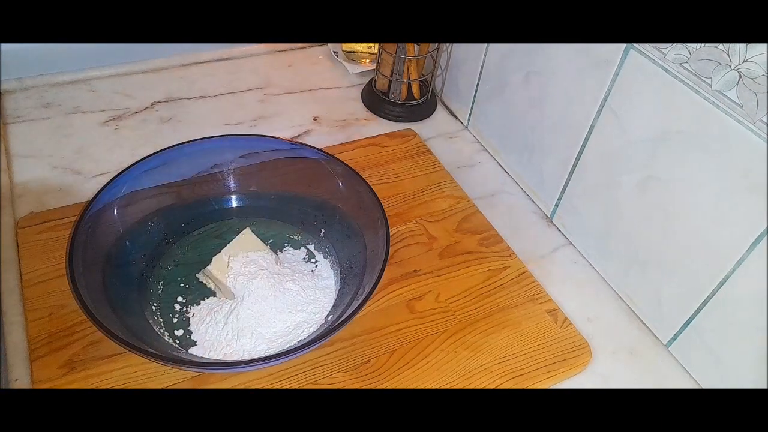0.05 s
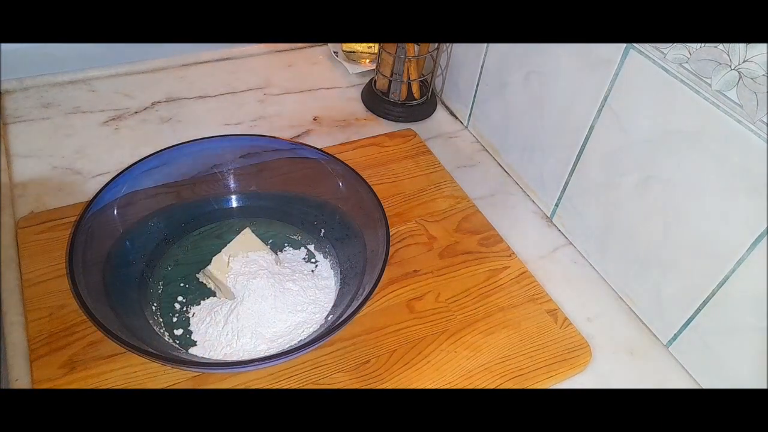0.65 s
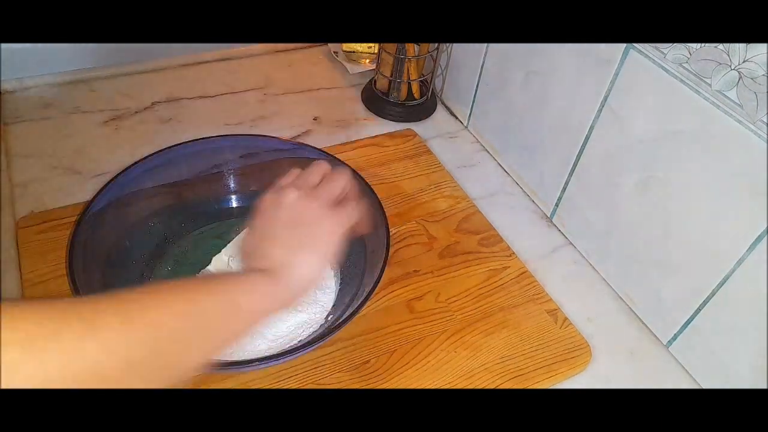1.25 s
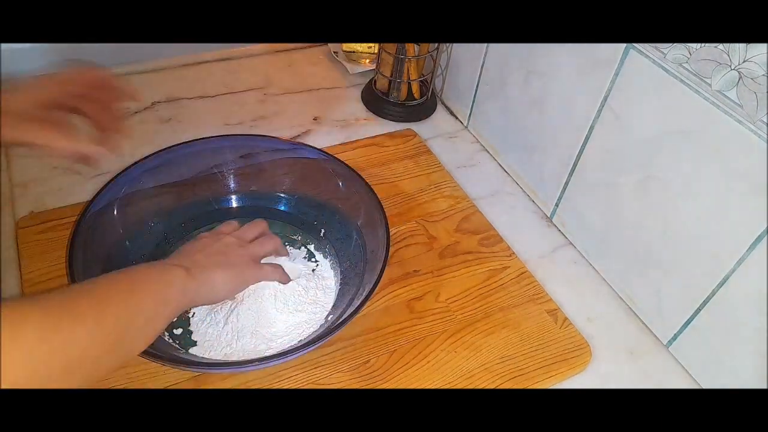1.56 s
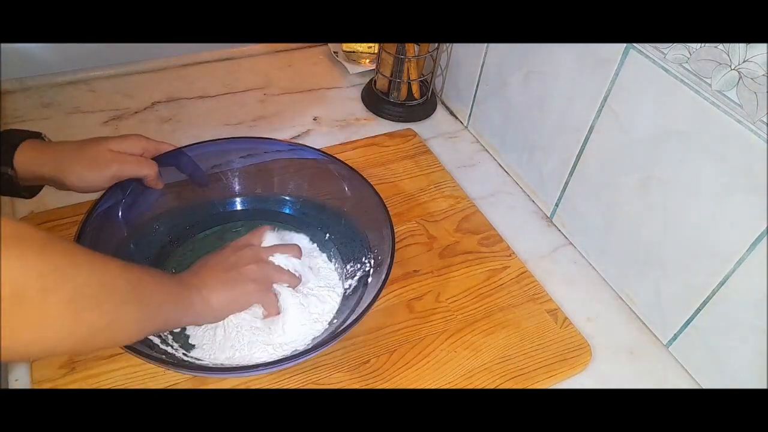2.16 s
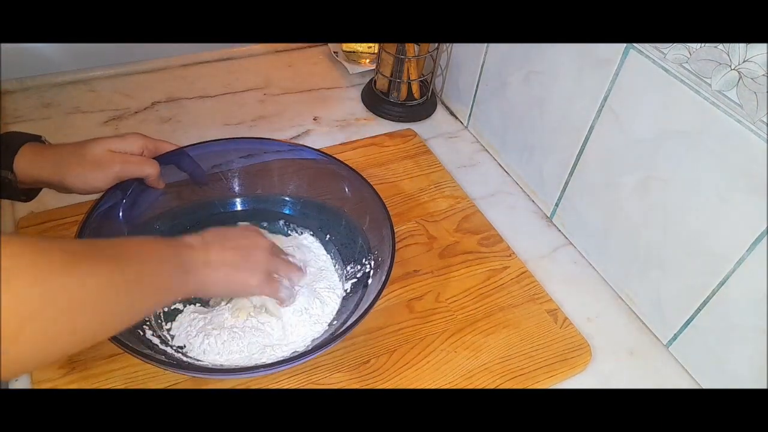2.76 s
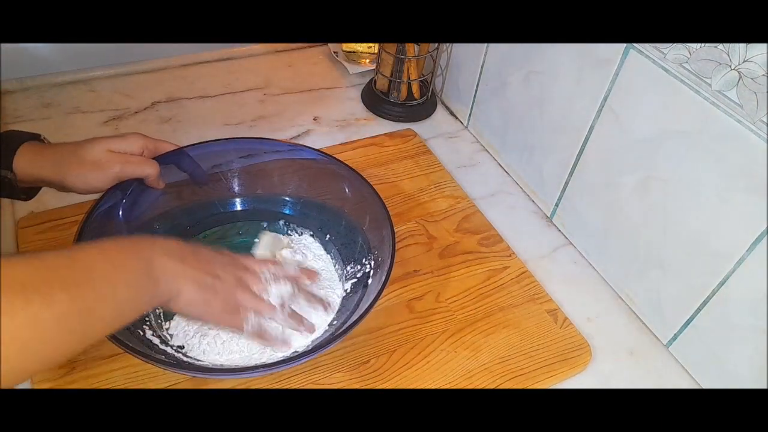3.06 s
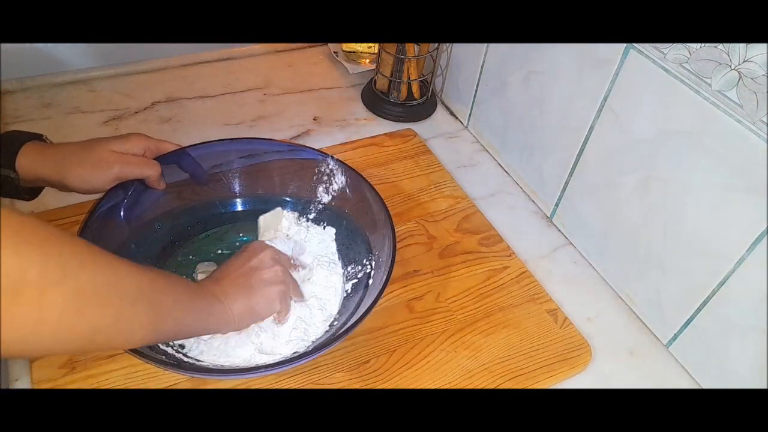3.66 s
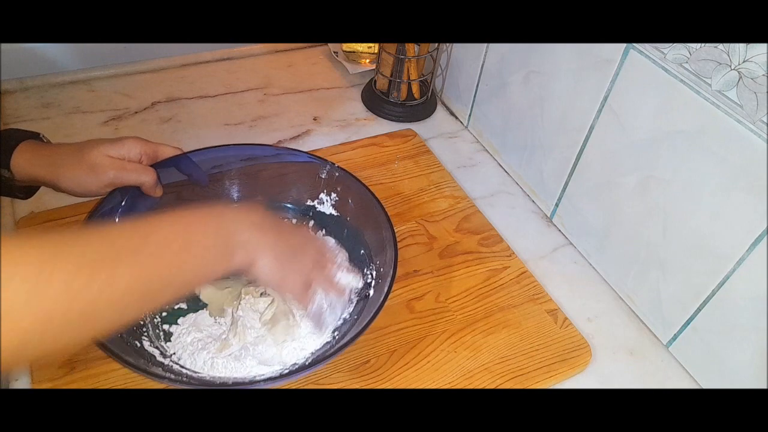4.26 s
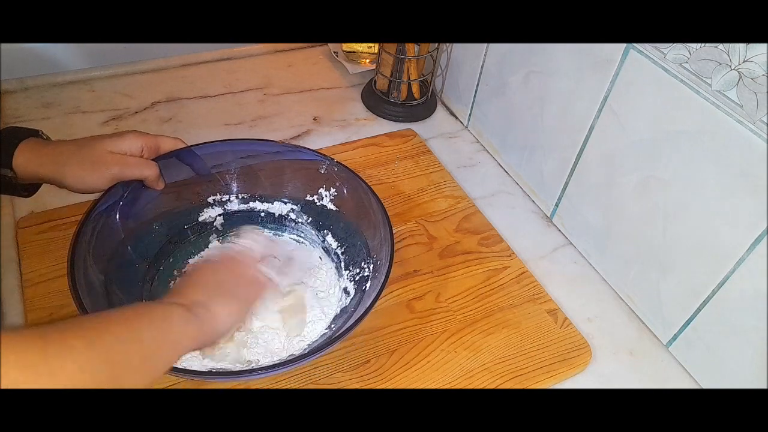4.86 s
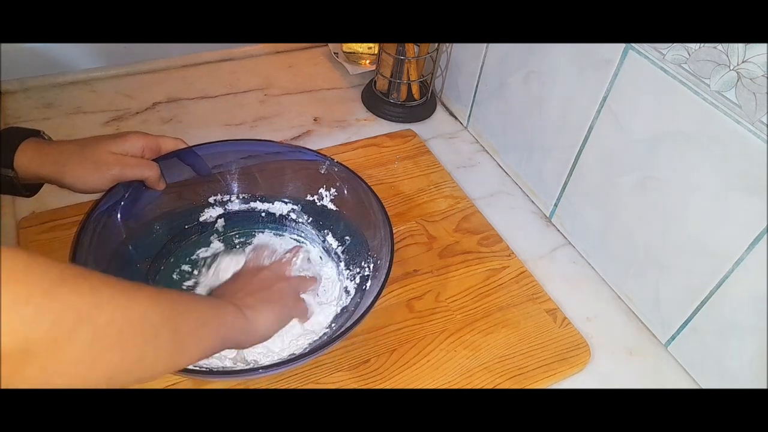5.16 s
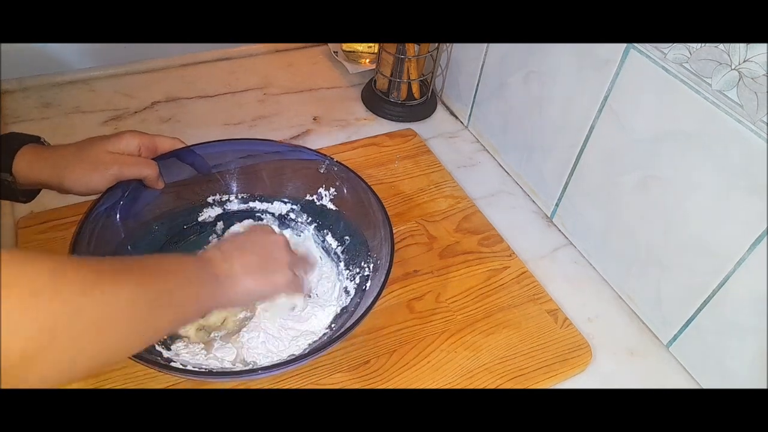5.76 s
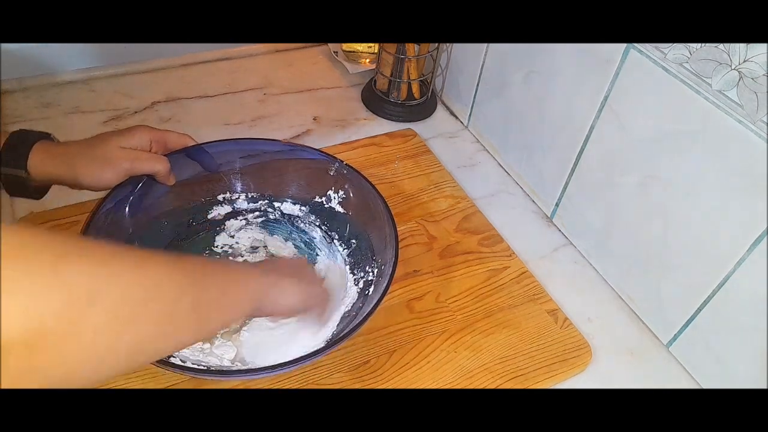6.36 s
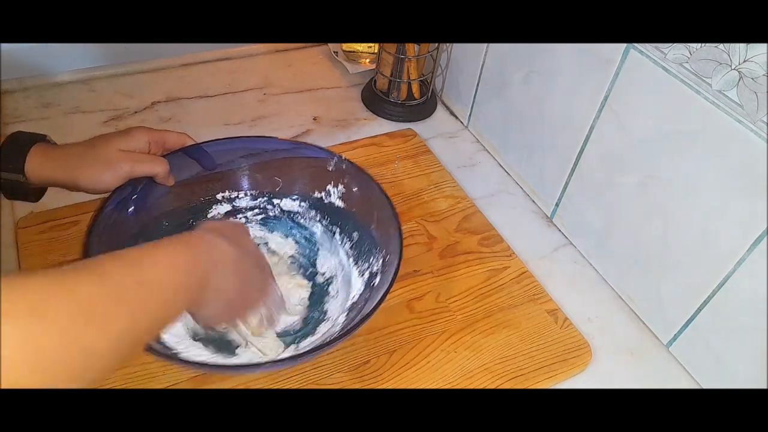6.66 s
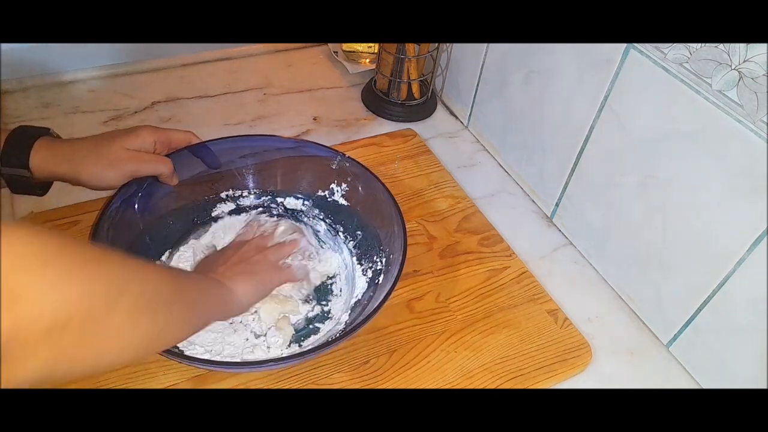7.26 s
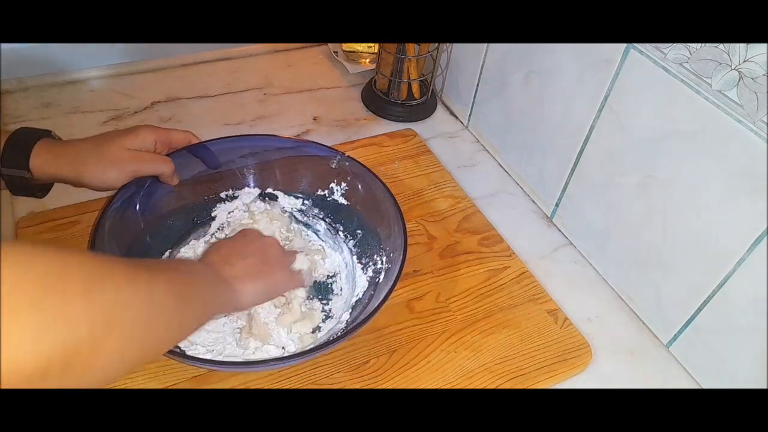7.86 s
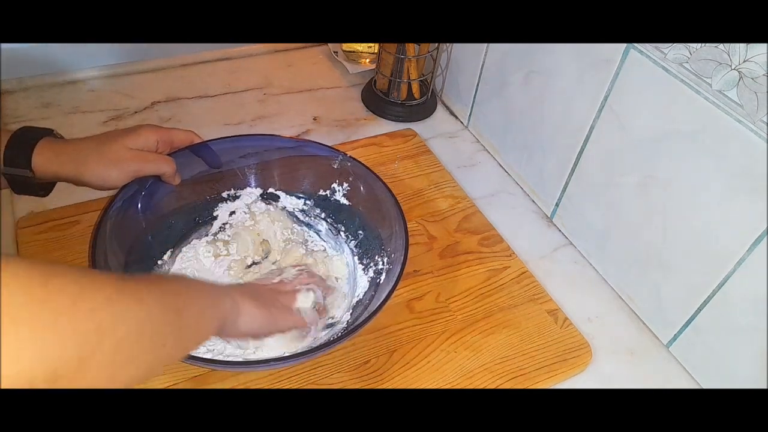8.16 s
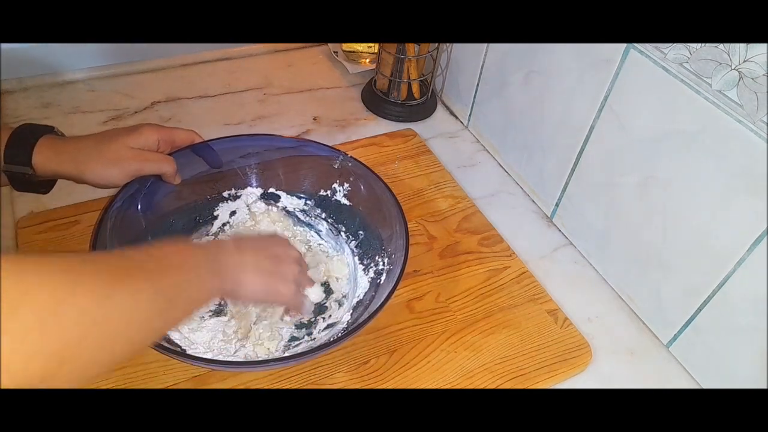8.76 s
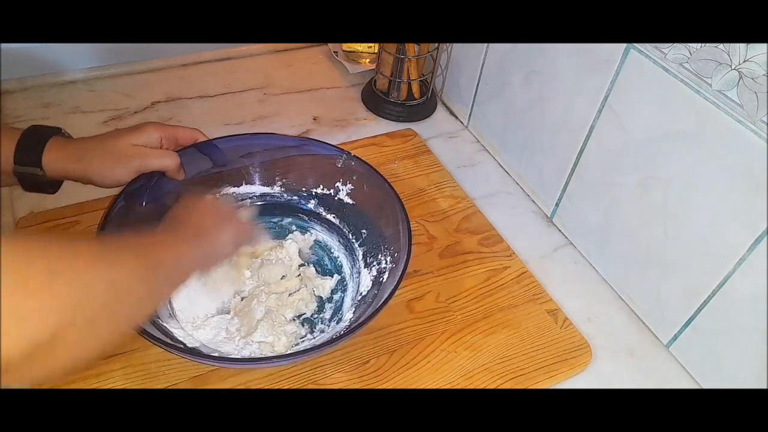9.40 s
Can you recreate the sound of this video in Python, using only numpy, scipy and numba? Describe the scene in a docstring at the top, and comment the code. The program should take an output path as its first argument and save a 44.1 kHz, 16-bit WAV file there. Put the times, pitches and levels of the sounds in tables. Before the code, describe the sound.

A faint low electrical hum runs throughout in a small tiled kitchen, with everything heard close up. At about 0.1 seconds a hard object lands on the counter, clattering and ringing briefly. A sleeve swishes softly twice around 0.7 to 1.2 seconds. From 1.3 seconds a hand works butter into flour in a big plastic bowl, with irregular dragging rubs, dry powdery hiss, sticky crackles and small snaps. The bowl knocks hollowly on a wooden board, most clearly near 1.8, 4.1, 6.1 and 8.9 seconds, more lightly near 2.5 and 7.7. Fingertips scuff and squeak faintly on the wall around 3, 6, 7 and 8 seconds. Brighter swishes of flour come at about 4.3 and from 6 to 6.5 seconds. The sticky crackling is busiest from 7 to 9 seconds, and another flour swish follows at about 9.2.

```python
"""Rubbing butter into flour

A small tiled kitchen with a low mains hum; two microphones close to a big plastic bowl on a wooden board.
Something hard is set down and rings, and a sleeve swishes past. Then a hand works in the bowl: dough
sticks and slips along the wall, flour hisses, skin squeaks, air pockets crackle in the squeezed butter,
and the bowl rocks and knocks on the board."""
import sys
import numpy as np
from scipy import signal
from scipy.fft import rfft, irfft, next_fast_len
from scipy.io import wavfile
from numba import njit

SR = 44100
rng = np.random.default_rng(int(sys.argv[2]) if len(sys.argv) > 2 else 0)


def generate_wav(sig):
    """Save sig (samples, or channels by samples) to the path in sys.argv[1] as 16-bit PCM at SR."""
    pcm = np.round(np.clip(np.atleast_2d(sig).T, -1, 1) * 32767).astype(np.int16)
    wavfile.write(sys.argv[1], SR, pcm)


N = 415863
T = np.arange(N) / SR
TAIL = T[:SR // 2]  # time within one short sound
HAND_IN_S = 1.2  # the hand reaches the flour

# first echoes off bowl, board and tiles: (left delay [s], right delay [s], level [dB])
ECHOES = [(.0013, 0.0018, -18.5), (.0036, 0.0031, -9), (.0056, .0060, -5), (.0095, 0.0087, -12)]
# how much the microphones differ on the bowl: (frequency [Hz], side gain [dB])
BOWL_WIDTH = [(100, -14), (250, 4.5), (500, -9.5), (700, -4), (1000, -1.5), (1600, 0)]
# room tone: (frequency [Hz], level [dB])
ROOM_TONE = [(25, -28), (60, -16), (115, 13.5), (190, 3), (300, -1.5), (450, -8), (700, -12.5),
             (1400, -19.5), (2000, -18), (3000, -23), (5200, -15.5), (7500, -16.5), (10000, -21),
             (14500, -29.5)]
# mains hum: (frequency [Hz], level [dB])
HUM_TONES = [(49.5, -67.5), (148.1, -59.5), (199, -69.5), (258.6, -79.5), (399.8, -71), (444.9, -78.5),
             (481.8, -78)]
# a hard object meets the counter: (time [s], level [dB], contact cutoff [Hz], crack [dB], ring [dB],
# hollow note [dB], ping [dB])
CLACKS = [(0.1382, -28.5, 13400, 16, -8, -3, -45), (0.149, -46, 9000, 33, -15, -20, -30),
          (0.158, -38, 6000, 17, -8, -16, -30), (0.267, -44, 2900, -8, -16, -7, -29),
          (0.276, -41, 3000, -3, -14, -12, -18), (0.2803, -48, 3500, 27, -4, -22, -20),
          (.311, -31, 11100, 1, -3, -2, -12), (0.336, -39, 13100, 9, -18, 2, -12)]
# its modes: (frequency [Hz], level [dB], t60 [s])
OBJECT_MODES = [(301, -4, .14), (537, -8, .14), (1035, -6, .13), (1300, -9, .08), (1491, -9, .14),
                (1685, -9, .1), (2019, -7, .14), (2140, -6, .15), (2664, -8, .12), (2935, -3, .13),
                (3252, -9, .09), (3491, -6, .12), (3898, -8, .08)]
# its rattle: (frequency [Hz], level [dB])
OBJECT_RATTLE = [(80, -10), (300, -8.5), (450, -3), (680, -4), (880, 3.5), (1200, -11.5), (2700, -8),
                 (4000, -12.5), (5500, -9.5), (6800, -26), (8500, -40), (11500, -42), (12900, -11.5),
                 (14500, -47)]
# passes of the sleeve: (start [s], rise [s], hold [s], level [dB])
SLEEVE_PASSES = [(0.676, 0.2, 0.041, -57.5), (0.907, 0.21, 0.022, -54)]
# sliding cloth: (frequency [Hz], level [dB])
CLOTH_SPECTRUM = [(200, -22), (900, -2), (1400, -6), (2800, -2.5), (5000, -2.5), (7500, -2), (10000, -7.5),
                  (14000, -4.5), (15500, -23)]
# rubs along the bowl: (start [s], rise [s], hold [s], dough [dB], flour [dB], hand resonance [Hz])
RUBS = [(1.324, 0.027, 0.17, -73, -66.5, 1860), (1.595, 0.029, 0.11, -61, -69, 1400),
        (1.878, 0.0064, 0.0047, -64, -35, 1600), (1.854, 0.05, 0.056, -40, -51.5, 1370),
        (2.525, 0.022, 0.084, -66, -67, 1200), (2.883, 0.03, 0.021, -46, -54, 1210),
        (2.938, 0.016, 0.093, -54.5, -54, 1320), (3.055, 0.02, 0.087, -43.5, -52.5, 1280),
        (3.157, 0.026, 0.0096, -37.5, -47, 1290), (3.331, 0.066, 0.048, -54, -57.5, 1190),
        (3.959, .015, 0.16, -60, -67, 1470), (4.137, 0.019, 0.13, -47.5, -48.5, 1450),
        (4.246, 0.062, 0.047, -43.5, -37, 2060), (4.38, 0.011, 0.011, -52, -62, 1200),
        (4.797, 0.036, 0.012, -53.5, -55, 1650), (4.862, 0.022, 0.073, -61, -59, 1880),
        (4.935, 0.012, 0.058, -46.5, -51, 1870), (4.99, .015, 0.064, -52.5, -57.5, 1100),
        (5.116, 0.021, 0.076, -56.5, -60, 1000), (5.933, 0.082, 0.048, -50.5, -50, 1730),
        (6.024, 0.05, 0.062, -47, -43, 2020), (6.096, 0.1, 0.21, -47, -45.5, 1760),
        (7.056, 0.05, 0.018, -46.5, -50.5, 1380), (7.14, 0.026, 0.11, -52.5, -55, 1030),
        (7.323, 0.013, 0.15, -59.5, -70, 1410), (7.564, 0.017, 0.2, -64, -60, 1520),
        (8.004, 0.041, 0.059, -45, -50, 1400), (8.12, 0.022, 0.078, -65, -58, 1600),
        (8.178, 0.02, 0.068, -49, -54.5, 1140), (8.726, 0.0093, 0.27, -53.5, -61, 1370),
        (8.862, 0.015, 0.01, -42.5, -42.5, 1570), (8.92, 0.083, 0.25, -55.5, -50.5, 1070),
        (9.09, 0.0089, 0.0097, -44.5, -65, 607), (9.113, 0.15, 0.047, -47, -43, 2400)]
# dragging dough: (frequency [Hz], level [dB])
DRAG_SPECTRUM = [(100, -26), (250, -46), (450, -10), (600, -1.5), (900, 1.5), (1150, -7), (1900, 2.5),
                 (3000, 1), (5000, -3.5), (8000, -53), (15000, -30)]
# air and wall resonances stirred by rubbing: (frequency [Hz], width [Hz], lift [dB])
CAVITY_PEAKS = [(608, 95, 18.5), (782, 74, 10.5), (1146, 250, 12.5), (1480, 67, 9), (1750, 98, 8),
                (2385, 100, 7)]
# dry flour: (frequency [Hz], level [dB])
FLOUR_SPECTRUM = [(200, -10), (700, -7.5), (1500, -5.5), (2600, 2), (4200, 5.5), (6000, 3), (7500, 3.5),
                  (10000, -3.5), (13000, -3), (15500, -17)]
# squeezes of the butter: (start [s], rise [s], hold [s], level [dB])
SQUEEZES = [(1.808, 0.054, 0.019, -44.5), (2.335, 0.2, 0.13, -61.5), (3.283, 0.08, 0.16, -59.5),
            (4.02, 0.08, 0.16, -56.5), (5.1, 0.086, 0.49, -67), (5.98, 0.095, 0.22, -49.5),
            (7.253, 0.019, 0.04, -55.5), (7.342, 0.079, 0.084, -54), (7.595, 0.025, 0.13, -58),
            (8.136, 0.068, 0.42, -57.5), (8.733, 0.056, 0.3, -53)]
# its crackle: (frequency [Hz], level [dB])
CRACKLE_SPECTRUM = [(300, -15), (1000, -0.5), (2500, 2), (6000, 3.5), (9000, 2.5), (13000, -2), (15500, -7)]
# butter letting go of the skin: (time [s], peak level [dB], centre [Hz], t60 [s])
SNAPS = [(1.701, -56, 3500, 0.16), (1.796, -36, 10300, 0.023), (1.886, -24.5, 5400, 0.019),
         (2.406, -46, 1800, 0.041), (3.178, -42, 2310, 0.02), (3.193, -42, 2200, 0.025),
         (3.971, -43.5, 5990, 0.026), (4.493, -58, 4640, 0.015), (4.946, -37, 3300, 0.035),
         (4.953, -40, 3800, .03), (4.998, -48, 2500, 0.036), (5.374, -43, 6030, 0.019),
         (7.069, -44.5, 2800, .05), (7.2464, -30, 6840, 0.02), (7.252, -34, 6500, 0.013),
         (7.359, -36, 12000, 0.0071), (7.375, -40, 3260, 0.097), (7.451, -41, 10200, .04),
         (7.617, -39, 11200, .012), (7.746, -41, 5400, 0.054), (8.02, -40, 2600, 0.09),
         (8.261, -37, 3600, 0.021), (8.381, -40, 3300, 0.044), (8.485, -51, 4000, 0.018)]
# skin catching on the wall: (midpoint [s], length [s], pitch [Hz], level [dB])
SQUEAKS = [(1.391, 0.12, 1740, -68), (1.687, 0.1, 1740, -65), (2.925, 0.063, 1520, -52),
           (3.0, 0.049, 1480, -56), (3.1, 0.057, 1520, -53), (6.003, 0.043, 1493, -53.5),
           (6.886, 0.28, 1910, -75.5), (7.11, 0.027, 1570, -51), (8.054, 0.087, 1903, -45),
           (8.785, 0.12, 1490, -58), (8.891, 0.039, 1687, -46)]
# fingertips juddering on the wall: (start [s], length [s], from [Hz], to [Hz], level [dB])
SCRAPES = [(1.692, 0.039, 3300, 4130, -57), (1.9, 0.046, 940, 1300, -49), (2.91, 0.031, 2400, 2200, -64),
           (3.075, 0.027, 1100, 1700, -48), (3.117, 0.014, 910, 1150, -39), (3.125, 0.045, 646, 630, -47.5),
           (3.134, 0.022, 1150, 1110, -43.5), (3.174, 0.025, 2110, 2570, -49.5),
           (3.178, 0.022, 1150, 950, -50), (3.28, 0.029, 1400, 1250, -61.5), (3.385, 0.036, 920, 850, -52),
           (4.812, 0.02, 2500, 2900, -59), (5.975, 0.054, 650, 720, -57), (6.04, 0.045, 1450, 1650, -54),
           (6.195, 0.12, 1100, 1250, -53), (6.24, .1, 725, 800, -55), (6.27, 0.089, 1660, 1500, -53),
           (6.33, 0.11, 1260, 1060, -54.5), (7.085, 0.059, 1260, 1460, -50.5),
           (7.135, 0.13, 1060, 870, -57), (8.06, 0.054, 1820, 1720, -49), (8.048, 0.065, 1280, 1200, -43.5),
           (8.058, 0.05, 780, 705, -50), (8.066, 0.024, 3060, 3370, -53), (8.2, 0.026, 1490, 1300, -47.5),
           (8.218, 0.028, 1010, 880, -50.5), (8.873, 0.045, 1580, 1720, -53)]
# shoved flour thinning or heaping up: (start [s], length [s], from [Hz], to [Hz], level [dB])
SWISHES = [(4.29, 0.058, 6200, 4400, -38.5), (4.315, 0.07, 3400, 2230, -47.5),
           (4.944, 0.044, 4000, 3220, -51), (6.05, .08, 5900, 3800, -48.5), (6.24, 0.053, 4300, 4800, -51),
           (6.39, 0.086, 4200, 5200, -52), (9.2, 0.17, 2660, 4360, -49.5)]
# the bowl meets the board: (time [s], wall [dB], contact cutoff [Hz], tock pitch [Hz],
# tock over wall [dB], base thud [dB], slap [dB])
KNOCKS = [(1.624, -47.5, 1080, 182, 3.5, -47.5, -70), (1.795, -34.5, 4370, 443, -4.5, -46, -41),
          (1.806, -33.5, 1500, 172, 14, -60, -46.5), (1.832, -42, 900, 403, 5, -50, -60),
          (2.522, -45, 2400, 690, 1, -50, -51), (2.53, -51.5, 1200, 280, -4, -51, -64),
          (2.872, -57, 4000, 600, -3, -55, -64), (2.906, -52, 800, 257, 19, -55, -70),
          (3.971, -59.5, 1200, 700, -21, -53, -66), (4.0491, -34.5, 1790, 615, 0, -46, -47.5),
          (4.056, -38, 1100, 287, 14, -46, -48), (4.089, -55, 900, 706, -2, -51, -52),
          (4.83, -70, 3500, 710, 2, -82, -55), (6.143, -38, 1600, 645, 1, -45.5, -43.5),
          (7.667, -56.5, 1200, 744, 2, -73, -66), (7.709, -44, 4500, 330, 0, -46, -44.5),
          (7.720, -47.5, 800, 296, 21, -49, -72), (8.860, -37, 1050, 672, 5, -50, -49),
          (9.007, -43.5, 1900, 686, -7, -44.5, -46.5), (9.031, -57, 700, 250, -3, -49, -64)]
# the bowl's wall: (frequency [Hz], level [dB], t60 [s])
WALL_MODES = [(200, -3.5, 0.054), (300, 2, 0.034), (417, -3, 0.11), (610, 3, 0.074), (744, 0, 0.15),
              (830, 6.5, 0.053), (1040, -19, 0.044), (1373, -22, 0.043), (1560, -6, 0.07),
              (1720, -5, 0.037), (1990, -16, 0.075)]
# its dense wash of modes: (frequency [Hz], level [dB])
WALL_WASH = [(80, -17), (200, 17), (310, 1), (500, 6), (750, -4), (1200, -3.5), (3000, -4.5), (6000, -5),
             (9000, -8), (15000, -52)]
# its base on the board: (frequency [Hz], level [dB], t60 [s])
BASE_MODES = [(71.8, -9.5, 0.46), (97, -3.5, 0.11), (120.6, -4.5, 0.42), (142.6, -5, 0.33), (170, 8, 0.038)]
# slap of its flat bottom: (frequency [Hz], level [dB])
SLAP_SPECTRUM = [(250, -27), (480, -5), (700, 12), (1000, 3.5), (1400, 0), (2000, -7), (2700, -16.5),
                 (5500, -16.5), (9000, -30), (15000, -45)]


def undb(db):
    """Decibels to gain."""
    return 10 ** (np.asarray(db) / 20)


def unit(x):
    """Scale to rms 1."""
    return x / np.sqrt(np.mean(x ** 2))


def onset_unit(x):
    """Scale a blow so that its first 25 ms have rms 1."""
    return x / np.sqrt(np.mean(x[:, :SR // 40] ** 2))


def add(out, s, sound):
    """Mix a sound in at s seconds."""
    i = int(s * SR)
    out[:, i:i + sound.shape[1]] += sound[:, :N - i]


def walk(rate):
    """Random drift of spread near 1, turning rate times a second."""
    knots = rng.standard_normal(N // 20)
    return np.interp(T * rate, np.arange(len(knots)), knots)


def fade(t60):
    """Exponential decay after a blow."""
    return np.exp(-np.log(1000) * TAIL / t60)


def push(start, rise, hold, release_t60=0.14, sag_db_per_s=2.5, settle_db=-13, settle_t60=0.68):
    """Gain of one movement: it builds up, eases while held, lets go and settles."""
    age = T - start
    eased_db = sag_db_per_s * np.clip(age - rise, 0, hold)
    after = np.log(1000) * np.maximum(age - rise - hold, 0)
    release = np.maximum(np.exp(-after / release_t60), undb(settle_db) * np.exp(-after / settle_t60))
    return np.clip(age / rise, 0, 1) * undb(-eased_db) * release


def colour(x, points, peaks=()):
    """Filter by points (frequency [Hz], gain [dB]) and peaks (centre [Hz], width [Hz], lift [dB])."""
    size = next_fast_len(x.shape[-1] + 4096, True)
    f = np.fft.rfftfreq(size, 1 / SR)
    hz, db = np.transpose(points)
    gain_db = np.interp(np.log(f + 1), np.log(hz), db)
    for centre, width, lift in peaks:
        gain_db = gain_db + lift / (1 + (2 * (f - centre) / width) ** 2)
    return irfft(rfft(x, size) * undb(gain_db), size)[..., :x.shape[-1]]


def soften(x, hz):
    """A longer contact takes away the treble."""
    return signal.sosfilt(signal.butter(2, min(hz, SR / 3), fs=SR, output="sos"), x)


@njit
def resonate(x, hz, q):
    """Band-pass with a moving centre, gain 1 there."""
    y = np.empty(len(x))
    band, low = 0., 0.
    for i in range(len(x)):
        g = np.tan(np.pi * hz[i] / SR)
        v = (band + g * (x[i] - low)) / (1 + g * (g + 1 / q))
        band, low = 2 * v - band, low + 2 * g * v
        y[i] = v / q
    return y


def diffuse(size, split_hz=750, bass_side=0.21):
    """Noise at two close microphones: alike in the bass, unrelated in the treble."""
    mid, side = rng.standard_normal((2, size))
    treble = signal.sosfilt(signal.butter(1, split_hz, "high", fs=SR, output="sos"), side)
    side = bass_side * side + (1 - bass_side) * treble
    return np.array([mid + side, mid - side])


def grains(rate, spread_db):
    """Random clicks of unequal size, each shared differently between the microphones."""
    hits = rng.random(N) < rate / SR
    size = np.minimum(rng.exponential(size=N), 3.3)
    angle = 2 * np.pi * rng.random(N)
    return hits * undb(spread_db * size) * np.array([np.cos(angle), np.sin(angle)])


def ring(modes, apart_hz=1100):
    """Struck modes; the higher ones reach the two microphones out of step."""
    out = 0
    for hz, db, t60 in modes:
        skew = min(hz / apart_hz, 1) * rng.choice([-1, 1]) * np.pi / 4 * np.array([[1], [-1]])
        out = out + rng.choice([-1, 1]) * undb(db) * fade(t60) * np.sin(2 * np.pi * hz * TAIL + skew)
    return out


def room(x, wet_db, early_db, t60=0.3):
    """Direct sound, echoes off the nearest surfaces, then the quick, dense ring of the kitchen."""
    tail = diffuse(len(TAIL)) * fade(t60) * (TAIL > .003)
    echo = undb(wet_db) * tail / np.sqrt(np.sum(tail ** 2) / 2)
    for left_s, right_s, db in ECHOES:
        echo[[0, 1], [int(left_s * SR), int(right_s * SR)]] += undb(db + early_db)
    echo = colour(echo, [(100, 7.5), (400, 10.5), (5000, -6.0), (15000, -0.5)])
    return x + signal.oaconvolve(x, echo, axes=1)[:, :N]


def narrow(x):
    """Most of the bowl's low notes reach both microphones almost in step."""
    mid = (x[0] + x[1]) / 2
    side = colour((x[0] - x[1]) / 2, BOWL_WIDTH)
    return np.array([mid + side, mid - side])


def room_tone(floor_db=-59.0, hum_db=-1, waver_db=1.2):
    """The kitchen itself: a faintly wavering mains hum over rumble and hiss."""
    hum = sum(undb(db + waver_db * walk(11)) * np.sin(2 * np.pi * (hz * T + rng.random()))
              for hz, db in HUM_TONES)
    return undb(floor_db) * unit(colour(diffuse(N), ROOM_TONE)) + undb(hum_db) * np.sqrt(2) * hum


def set_down(crack_hz=2500, rattle_db=-3, hollow_hz=863, swell_s=0.027, beat_hz=27, ping_hz=5201):
    """A hard object lands, tips and settles on the counter; its cavity rings up slowly under a ping."""
    out, notes = np.zeros((2, 2, N))
    crack = np.sin(2 * np.pi * crack_hz * TAIL) * fade(t60=0.0019)
    swell = onset_unit(np.array([fade(t60=0.21) * (1 - np.exp(-TAIL / swell_s))]))
    skew = np.array([[1.12], [-1.12]])  # phase at each microphone [rad]
    for s, db, cutoff_hz, crack_db, ring_db, hollow_db, ping_db in CLACKS:
        rattle = onset_unit(colour(diffuse(len(TAIL)) * fade(t60=0.14), OBJECT_RATTLE))
        modes = onset_unit(ring(OBJECT_MODES))
        blow = undb(crack_db) * crack + undb(ring_db) * modes + undb(rattle_db) * rattle
        add(out, s, undb(db) * onset_unit(soften(blow, cutoff_hz)))
        # a close second mode beats against the hollow note
        twin = undb(-10) * np.sin(2 * np.pi * ((hollow_hz - beat_hz) * TAIL + rng.random((2, 1))))
        hollow = undb(hollow_db) * swell * (np.sin(2 * np.pi * hollow_hz * (TAIL + s) + skew) + twin)
        ping = undb(ping_db) * fade(t60=0.25) * np.sin(2 * np.pi * ping_hz * (TAIL + s) + skew / 2)
        add(notes, s, undb(db) * (hollow + ping))
    return room(out, wet_db=-7.5, early_db=-11.5) + notes


def sleeve(flutter_db=1):
    """Cloth slides close by the microphones, twice, as the arm reaches for the bowl."""
    power = sum((undb(db) * push(start, rise, hold, release_t60=0.33)) ** 2
                for start, rise, hold, db in SLEEVE_PASSES)
    return unit(colour(diffuse(N), CLOTH_SPECTRUM)) * np.sqrt(power) * undb(flutter_db * walk(35.2))


def hand(rest_drag_db=-107.5, rest_flour_db=-69.5, closed_hz=890, closing_s=0.83, waver_octaves=0.37):
    """Dough gain, flour gain and the hand's resonance, which shifts as the fingers close and move."""
    drag_power = np.full(N, undb(rest_drag_db) ** 2)
    flour_power = (T > HAND_IN_S) * undb(rest_flour_db) ** 2  # a faint flour hiss stays on between rubs
    weighted_hz = drag_power * closed_hz  # the strongest rub sets the resonance
    for start, rise, hold, drag_db, flour_db, open_hz in RUBS:
        power = push(start, rise, hold) ** 2
        hz = closed_hz + (open_hz - closed_hz) * np.exp(-np.maximum(T - start, 0) / closing_s)
        drag_power += power * undb(drag_db) ** 2
        flour_power += power * undb(flour_db) ** 2
        weighted_hz += power * undb(drag_db) ** 2 * hz
    pressure = undb(-0.24 * walk(25))
    hollow_hz = weighted_hz / drag_power * 2 ** (waver_octaves * walk(30))
    return np.sqrt(drag_power) * pressure, np.sqrt(flour_power * pressure), hollow_hz


def rubbing(drag_gain, flour_gain, hollow_hz, hollow_q=2.6, drag_db=-4.5, flour_db=-3.5, rumble_db=-38):
    """Dough sticks and slips under the cupped hand, flour grains shear, and the push shakes the base."""
    slip_db = 2.5 * walk(110)
    friction = colour(grains(rate=1500, spread_db=2.0), DRAG_SPECTRUM, CAVITY_PEAKS)
    cupped = np.array([resonate(side, hollow_hz, hollow_q) for side in friction])
    drag = unit(cupped + undb(-7) * friction) * drag_gain * undb(drag_db + slip_db)
    hiss = unit(colour(grains(rate=7000, spread_db=0.5), FLOUR_SPECTRUM))
    flour = hiss * flour_gain * undb(flour_db + slip_db / 2)
    shake = colour(diffuse(N),
                   [(30, 0), (70, -23), (125, 6), (175, -13), (260, -9), (600, -13.5), (3000, -100)])
    rumble = unit(shake) * undb(rumble_db) * drag_gain ** 0.35
    return narrow(room(drag + flour, wet_db=-4.5, early_db=-1.5)) + rumble


def butter(crackle_db=-5.5, stray_db=-50):
    """Air pockets burst in squeezed butter, a few between squeezes; it snaps as it lets go of the skin."""
    squeeze = sum(undb(db) * push(start, rise, hold) for start, rise, hold, db in SQUEEZES)
    out = unit(colour(grains(rate=500, spread_db=0), CRACKLE_SPECTRUM)) * undb(crackle_db) * squeeze
    out += colour(grains(rate=6, spread_db=1), CRACKLE_SPECTRUM) * undb(stray_db) * (T > HAND_IN_S)
    for s, db, hz, t60 in SNAPS:
        band = [(hz / 8, -30), (hz / 2, -11), (hz, 0), (2 * hz, -9), (4 * hz, -16)]
        snap = colour(diffuse(len(TAIL)) * fade(t60), band)
        add(out, s, undb(db) * snap / np.abs(snap).max())
    return room(out, wet_db=-2, early_db=-4)


def crumbs(drag_gain, per_s=170, low_hz=650, high_hz=5000, crumb_db=-0.5, spread_db=2.4, cycles=1.8):
    """Lumps break under the hand: tiny ticks of random pitch and size that follow the drag."""
    out, age = np.zeros((2, N)), TAIL[:SR // 100]
    for when, pitch, luck, turn in rng.random((int(per_s * N / SR), 4)):
        hz = low_hz * (high_hz / low_hz) ** pitch
        size = drag_gain[int(when * N)] * undb(crumb_db + spread_db * min(-np.log(1 - luck), 3))
        skew = np.pi * (turn - .5) * np.array([[1], [-1]])
        add(out, when * N / SR, size * np.exp(-age * hz / cycles) * np.sin(2 * np.pi * hz * age + skew))
    return out


def squeaks(width_hz=220):
    """Skin catches on the wall: stick-slip locks briefly onto one rough pitch."""
    out = np.zeros((2, N))
    for s, length, hz, db in SQUEAKS:
        band = [(hz / 2, -50), (hz, -30), (2 * hz, -50)]
        tone = unit(colour(diffuse(len(TAIL)), band, peaks=[(hz, width_hz, 30)]))
        add(out, s - length / 2, undb(db) * tone * np.sin(np.pi * np.minimum(TAIL / length, 1)))
    return out


def knocks(crack_db=9, tock_t60=0.029, flex_hz=300, detune=0.025, contact_s=0.00073, swell_s=0.0042):
    """The bowl rocks onto the board: a slap, a damped tock, a ringing wall and a thud from the base."""
    out = np.zeros((2, N))
    for s, wall_db, cutoff_hz, tock_hz, tock_db, base_db, slap_db in KNOCKS:
        wash_decay = fade(t60=0.35) + undb(crack_db) * fade(t60=0.04)
        wash = colour(diffuse(len(TAIL)) * wash_decay, WALL_WASH)
        tock = ring([(tock_hz, 0, tock_t60), (flex_hz, -8, tock_t60)], apart_hz=2170)
        # the grip shifts the wall's pitch from knock to knock
        wall = ring([(hz * (1 + detune * rng.standard_normal()), db, t60) for hz, db, t60 in WALL_MODES])
        blow = onset_unit(wall) + onset_unit(wash) + undb(tock_db) * onset_unit(tock)
        blow = onset_unit(soften(blow * (1 - np.exp(-TAIL / contact_s)), cutoff_hz))
        thud = onset_unit(ring(BASE_MODES) * (1 - np.exp(-TAIL / swell_s)))
        slap = onset_unit(colour(diffuse(len(TAIL)) * fade(t60=0.053), SLAP_SPECTRUM))
        add(out, s, undb(wall_db) * blow + undb(base_db) * thud + undb(slap_db) * slap)
    return narrow(room(out, wet_db=-11, early_db=-38))


def strokes(rows, grit, q, judder_db, judder_rate, wander_octaves):
    """Short surges of grit, each through its own gliding, unsteady resonance."""
    out = np.zeros((2, N))
    grit = grit * undb(judder_db * walk(judder_rate))
    wander = 2 ** (wander_octaves * walk(judder_rate))
    for s, length, first_hz, last_hz, db in rows:
        along = np.linspace(0, 1, int(length * SR))
        span = slice(int(s * SR), int(s * SR) + len(along))
        hz = first_hz * (last_hz / first_hz) ** along * wander[span]
        surge = np.array([resonate(resonate(side, hz, q), hz, q) for side in grit[:, span]])
        add(out, s, undb(db) * unit(surge * np.sin(np.pi * along)))
    return out


def fingers(drag_gain):
    """Fingertips scuff the wall, shove flour in fine, bright swishes and break crumbs."""
    scrapes = strokes(SCRAPES, grains(rate=1400, spread_db=2.3), q=2.5,
                      judder_db=2.7, judder_rate=130, wander_octaves=.16)
    swishes = strokes(SWISHES, grains(rate=9000, spread_db=1.2), q=1.1,
                      judder_db=1.5, judder_rate=250, wander_octaves=.05)
    return narrow(room(scrapes + swishes + crumbs(drag_gain), wet_db=-7, early_db=-16))


def scene():
    """The kitchen as heard from beside the bowl."""
    drag_gain, flour_gain, hollow_hz = hand()
    blows = set_down() + knocks()
    in_bowl = rubbing(drag_gain, flour_gain, hollow_hz) + fingers(drag_gain) + squeaks() + butter()
    return blows + in_bowl + sleeve() + room_tone()


def record(dry, top_hz=15700):
    """Both microphones cut deep bass and have a notch at 8-9 kHz; the left is weak in the low mids."""
    left = colour(dry[0], [(25, -28), (45, 1), (140, -3), (300, -7), (550, -6), (2000, -0.5),
                           (4500, -0.16), (12000, 0)], peaks=[(8910, 590, -19)])
    right = colour(dry[1], [(25, -37), (45, 2.5), (140, -2), (300, -3.5), (550, -5.5), (2000, -1),
                            (4500, 2.5), (12000, -2.5)], peaks=[(8020, 1260, -20)])
    treble_cut = signal.ellip(8, .2, 70, top_hz, fs=SR, output="sos")
    return signal.sosfilt(treble_cut, np.array([left, right]))


dry = scene()
out = record(dry)
generate_wav(out)
```